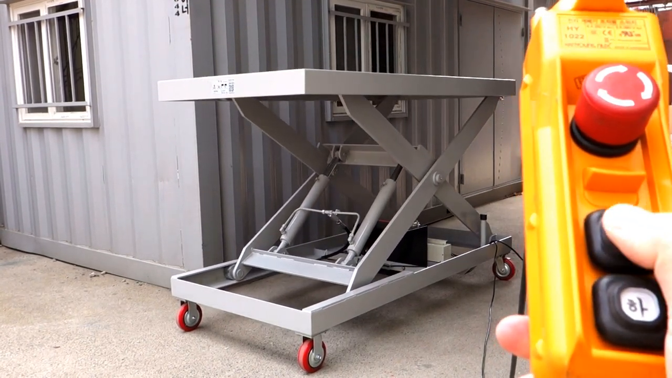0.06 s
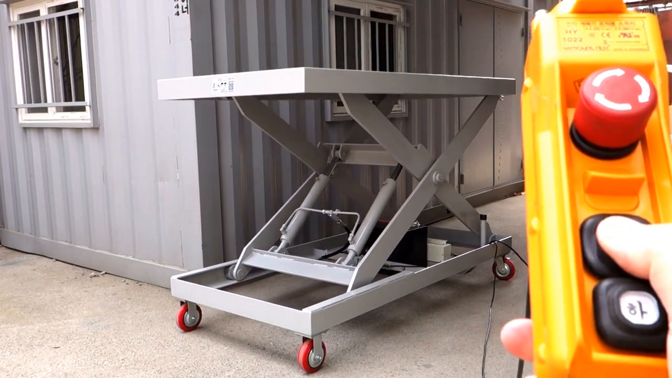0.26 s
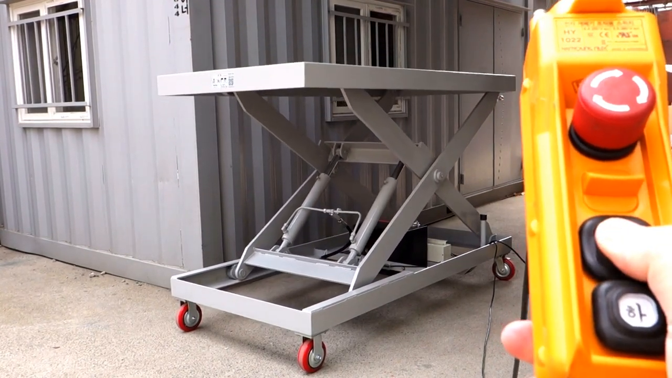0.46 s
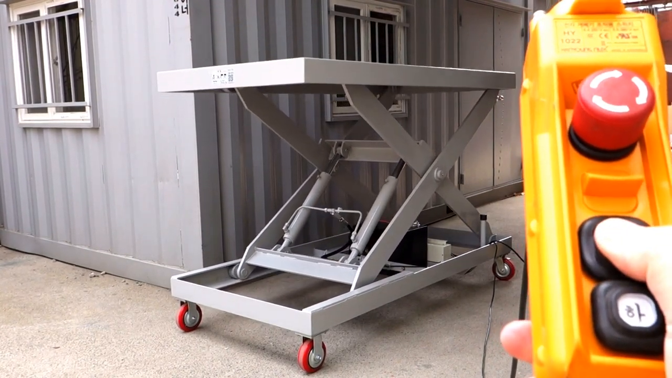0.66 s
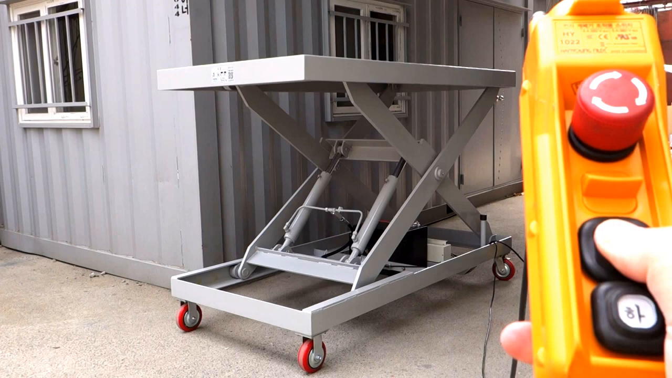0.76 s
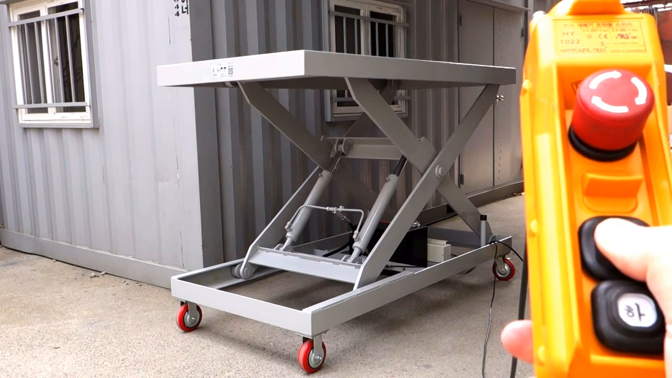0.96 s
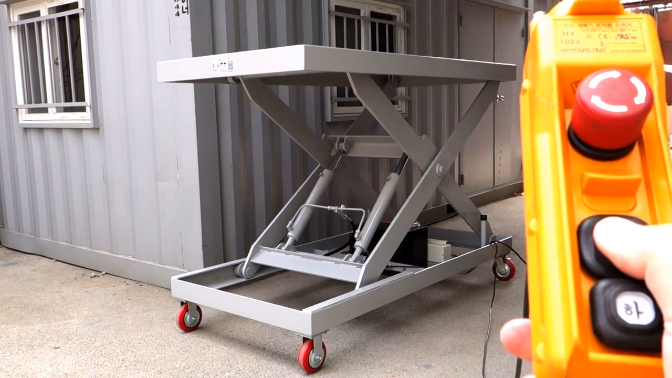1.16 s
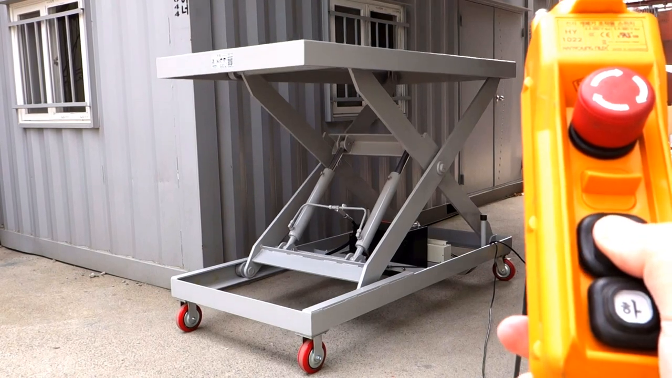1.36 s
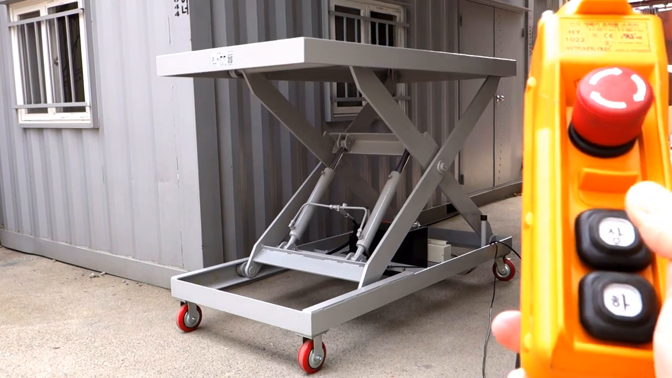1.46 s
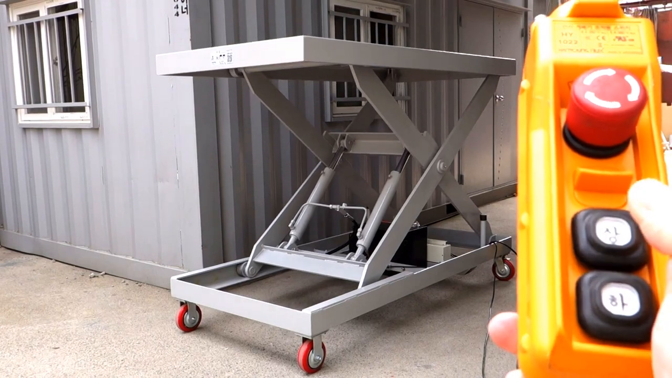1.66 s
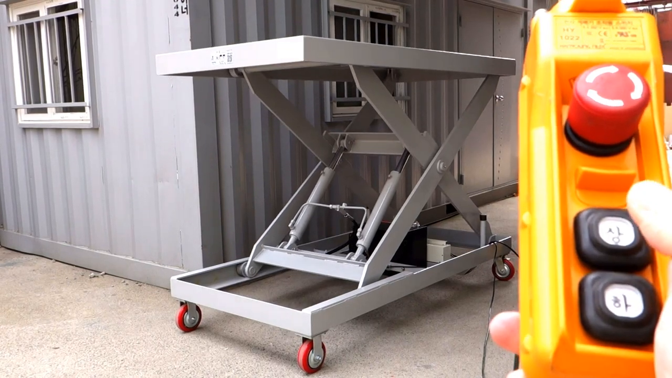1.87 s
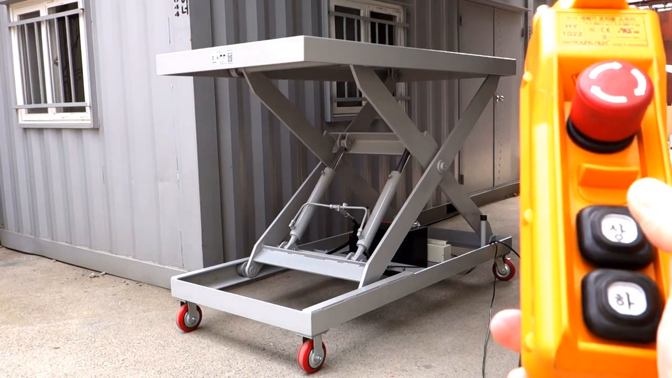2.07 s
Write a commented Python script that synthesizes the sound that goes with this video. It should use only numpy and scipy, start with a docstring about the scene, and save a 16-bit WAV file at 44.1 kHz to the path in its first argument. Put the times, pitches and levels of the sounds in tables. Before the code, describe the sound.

An electric hydraulic pump raises a lift table: button click, hard contactor clack, steady buzzing hum with rattles and a short groan, then a click and loud steel clank, ringing in a metal-walled yard, close stereo microphone.

```python
"""A hydraulic lift table runs for a second in a yard between metal walls, heard by two close microphone ports.
The motor hums at a mains multiple and beats against the tooth tones of a nine-tooth gear pump.
A hand-held button clicks, the contactor slams, and the frame groans and rattles as it takes the load.
On release the button clicks and the table stops with a clank that rings off the walls as decaying noise.
Behind it lie the filtered noise of far traffic and machinery, a low rumble and, late on, a faint drone."""
import sys
import numpy as np
from scipy import signal
from scipy.fft import rfft, irfft
from scipy.io import wavfile
from scipy.ndimage import uniform_filter1d, map_coordinates

SR = 44100
rng = np.random.default_rng(int(sys.argv[2]) if len(sys.argv) > 2 else 0)


def level_to_linear(level):
    """Convert decibel levels to linear amplitude factors, elementwise."""
    exponent = np.asarray(level, float) / 20
    return 10 ** exponent


def dump_mix(stems):
    """Bounce the given channels to the path in sys.argv[1] as a 16-bit WAV at rate SR."""
    frames = np.atleast_2d(stems).T  # one column per channel
    limited = np.clip(frames, -1, 1)  # hard clip at full scale
    pcm = np.round(limited * 32767).astype(np.int16)
    wavfile.write(sys.argv[1], SR, pcm)


N = 94815
T = np.arange(N) / SR
ON_S, OFF_S = 0.211, 1.457  # the motor gets power, and loses it


def evened(x):
    """Scales a signal to an rms of one."""
    return x / np.sqrt(np.mean(x ** 2) + 1e-20)


def curve(rows, index=1):
    """Draws one column of a timed table as a line over the whole scene."""
    columns = np.transpose(rows)
    return np.interp(T, columns[0], columns[index])


def read(points, hz):
    """Reads a table of values against pitch, on a logarithmic pitch scale."""
    f, value = np.transpose(points)
    return np.interp(np.log(hz + 1), np.log(f + 1), value)


def coloured(x, points):
    """Filters a signal by a table of gains in dB, mirrored in time so that the ends do not wrap."""
    gain = level_to_linear(read(points, np.fft.rfftfreq(2 * N, 1 / SR)))
    mirrored = np.r_[x, x[::-1]]
    return irfft(rfft(mirrored) * gain, 2 * N)[:N]


def noise(points):
    """White noise coloured by a table and scaled to an rms of one."""
    return evened(coloured(rng.standard_normal(N), points))


def waver(depth_db=1):
    """A slow random wandering of level, depth_db rms."""
    drift = uniform_filter1d(rng.standard_normal(N), size=4000)
    return level_to_linear(depth_db * evened(uniform_filter1d(drift, size=4000)))


def strike(rows, modes, colour, decay, dense_db):
    """Each blow rings the named modes with uneven strength, over a burst of modes too dense to tell apart."""
    mode_scatter = 0.012  # spread of each mode's pitch from blow to blow, as a fraction
    t, out = np.arange(SR // 3) / SR, np.zeros(N)
    hz, db, t60 = np.transpose(modes)[:, :, None]
    attack = np.minimum(t / 0.00015, 1)
    for start_s, level_db, tilt_db in rows:
        luck = rng.standard_normal((len(modes), 2))
        mode_db = db + tilt_db * np.log2(hz / 1000) + luck[:, :1] - 60 * t / t60
        mode_hz = hz * (1 + mode_scatter * luck[:, 1:])
        ring = (level_to_linear(mode_db) * np.sin(2 * np.pi * mode_hz * t)).sum(0)

        f, frame_s, z = signal.stft(rng.standard_normal(len(t)), SR, nperseg=192)
        colour_db = read(colour, f) + tilt_db * np.log2((f + 300) / 1300)
        decay_db = -60 * frame_s / read(decay, f)[:, None]
        dense = signal.istft(z * level_to_linear(colour_db[:, None] + decay_db), SR, nperseg=192)[1][:len(t)]

        blow = ring / abs(ring).max() + level_to_linear(dense_db) * dense / abs(dense).max()
        part = out[round(start_s * SR):][:len(t)]
        part += (level_to_linear(level_db) * blow * attack)[:len(part)]
    return out


# Colour of the far yard noise. Each row: pitch in Hz, relative level in dB per Hz.
YARD_COLOUR = [(12, -68), (20, -6.5), (64, -2.5), (157, -5.5), (306, -3), (439, -10.5), (686, -10),
               (811, -15), (1540, -18.5), (2090, -23.5), (15500, -68.5)]
# Level of the yard noise at the microphone. Each row: time in seconds, rms level in dB.
YARD_LEVEL = [(0, -38), (.2, -37.5), (1.0, -36), (1.7, -33.5), (2.15, -34.5)]


def yard():
    """Far traffic and machinery reach the microphone as a dull wash of noise."""
    return noise(YARD_COLOUR) * level_to_linear(curve(YARD_LEVEL))


# A faint drone in the yard. Each row: time in seconds, pitch in Hz, level in dB before the shared lift.
DRONE_PATH = [(1.62, 224.4, -66), (1.72, 224.5, -42), (1.8, 223.4, -41), (1.92, 228.2, -45.5),
              (2.03, 223.8, -47.5)]
# Harmonics of the drone, from the first multiple to the third: relative level in dB.
DRONE_HARMONICS = [-0.55, 0.12, -7]


def drone():
    """Three harmonics follow one gliding pitch, each wavering by itself."""
    lift_db = 4
    turns = np.cumsum(curve(DRONE_PATH)) / SR
    tone = np.zeros(N)
    for k, db in enumerate(DRONE_HARMONICS, start=1):
        tone += level_to_linear(db + lift_db) * np.sin(2 * np.pi * k * turns) * waver(depth_db=2)
    return tone * level_to_linear(curve(DRONE_PATH, index=2)) * (T > DRONE_PATH[0][0])


# Level of the low rumble. Each row: time in seconds, rms level in dB.
RUMBLE_LEVEL = [(0, -44), (.4, -58), (.6, -48), (.9, -38.5), (1.1, -49), (1.4, -75), (2.15, -47)]


def rumble():
    """A narrow band of low noise swells and fades."""
    hz = 46.8  # pitch from which the band's corners are scaled
    band = [(hz * 0.5, -20), (hz * 1.2, -3), (hz, 0.1), (hz * 1.22, -5), (hz * 2, -40), (20000, -120)]
    return noise(band) * level_to_linear(curve(RUMBLE_LEVEL))


# Ringing time between the metal walls. Each row: pitch in Hz, time to die by 60 dB in seconds.
WALL_T60 = [(200, 0.83), (1000, 0.64), (4000, 0.68), (10000, 0.48), (15000, 0.56)]


def walls(x):
    """The walls answer with a noise tail, each band dying at its own speed."""
    late_noise = rng.standard_normal(SR) * (np.arange(SR) > 300)  # the first 7 ms stay silent
    hz, t, z = signal.stft(late_noise, SR, nperseg=256)
    tail = signal.istft(z * level_to_linear(-60 * t / read(WALL_T60, hz)[:, None]), SR, nperseg=256)[1]
    return signal.fftconvolve(x, tail / np.linalg.norm(tail))[:N]


# Clicks of the hand-held button. Each row: start in seconds, level in dB, brightness in dB per octave.
BUTTON_CLICKS = [(.1874, -25, -3), (.1982, -19.5, 0), (1.4292, -19, 0), (1.7936, -46, -2)]
# Modes of its plastic case. Each row: pitch in Hz, relative level in dB, time to die by 60 dB in seconds.
PLASTIC_MODES = [(1950, -4, .012), (3050, -7, .01), (3800, -1, .014), (4600, -1, .012), (5900, -10, .012),
                 (7700, -7, .01), (8700, -10, .008), (10600, -15, .008), (14000, -20, .006)]
# Colour of the plastic snap. Each row: pitch in Hz, relative level in dB per Hz.
SNAP_COLOUR = [(1200, -10), (2000, 0), (4300, 2), (8000, -4), (15000, -12)]
# Decay of the snap. Each row: pitch in Hz, time to die by 60 dB in seconds.
SNAP_DECAY = [(1000, 0.03), (15000, 0.01)]


def button():
    """The button's small plastic case snaps and rings for about a hundredth of a second."""
    return strike(BUTTON_CLICKS, PLASTIC_MODES, SNAP_COLOUR, SNAP_DECAY, dense_db=0.06)


# Colour of dense sheet-metal modes. Each row: pitch in Hz, relative level in dB per Hz.
CRASH_COLOUR = [(150, -22), (320, 2.5), (700, -1.5), (1300, 5.5), (2100, -1.5), (4000, -10), (6000, -20.5),
                (9000, -19.5), (15000, -32.5)]
# Decay of those modes. Each row: pitch in Hz, time to die by 60 dB in seconds.
CRASH_DECAY = [(300, 0.1), (1500, 0.11), (4000, 0.083), (10000, 0.072)]


def sheet_metal(rows, modes, dense_db):
    """Blows ring a metal part's own modes over the crash of crowded sheet-metal modes."""
    return strike(rows, modes, CRASH_COLOUR, CRASH_DECAY, dense_db)


# The contactor closing and bouncing. Each row: start in seconds, level in dB, brightness in dB per octave.
CONTACTOR_SLAMS = [(.2095, -15, -6), (.2165, -15.5, 3), (.224, -19, 0)]
# Modes of the contactor. Each row: pitch in Hz, relative level in dB, time to die by 60 dB in seconds.
CONTACTOR_MODES = [(258, -9, .2), (340, 5, .09), (651, 0, .32), (1314, -4, .07), (1599, -5, .07),
                   (1825, -2, .08), (2132, -14, .07), (2552, -15, .06), (3300, -14, .035), (3919, -15, .03),
                   (5900, -16, .025)]


def contactor():
    """The contactor slams shut and bounces, ringing its modes at each contact."""
    return sheet_metal(CONTACTOR_SLAMS, CONTACTOR_MODES, dense_db=-3.0)


# Blows on the steel frame. Each row: start in seconds, level in dB, brightness in dB per octave.
FRAME_KNOCKS = [(.32, -25, 2.5), (.379, -30, -1), (.391, -29, 0.5), (.478, -29.5, 3.5), (.495, -18.5, -16),
                (.525, -29.5, 5), (.67, -28, -3.5), (1.4515, -18, -5.5), (1.4575, -8, -2.5),
                (1.461, -13, 3.5), (1.465, -14.5, -6), (1.477, -17.5, 1.5), (1.505, -19.5, -0.5),
                (1.53, -25, 0.5), (1.556, -26.5, 3)]
# Modes of the frame when struck. Each row: pitch in Hz, relative level in dB, 60 dB decay in seconds.
FRAME_MODES = [(222, -11, .1), (381, -6, .07), (560, -2, .1), (690, 1, .05), (870, -5, .07), (990, -1, .1),
               (1093, -4, .04), (1319, 1, .1), (1700, -9, .07), (2099, -1, .12), (2557, -10, .08),
               (3634, -10, .07)]


def frame_knocks():
    """The steel frame is knocked as the load comes on, and clanks when the table stops."""
    return sheet_metal(FRAME_KNOCKS, FRAME_MODES, dense_db=0.78)


# Level of the rattle before the low cut. Each row: time in seconds, level in dB.
RATTLE_LEVEL = [(.21, -37.5), (.3, -31.5), (.4, -33.5), (.52, -31), (.6, -38.5), (.75, -43.5),
                (1.45, -44.5), (1.47, -26.5), (1.6, -43.5), (1.75, -43.5)]


def rattle():
    """Loose joints chatter into the frame while the load settles; each joint rings it a little differently."""
    taps_per_s, spread_db = 1500, 2.5  # all joints together; mean excess of a tap's level
    joints = FRAME_MODES * 3
    t, out = np.arange(SR // 4) / SR, np.zeros(N)
    for hz, db, t60 in joints:
        tapped = rng.random(N) < taps_per_s / len(joints) / SR
        taps = level_to_linear(spread_db * np.minimum(rng.exponential(1, N), 4)) * tapped
        # duller than a blow, and dying 2.5 times as fast
        ring_db = db - 6.6 * np.log2(hz / 1000) - 150 * t / t60
        ring = level_to_linear(ring_db) * np.sin(2 * np.pi * hz * rng.uniform(0.88, 1.12) * t)
        out += signal.oaconvolve(taps, ring)[:N]
    return evened(out) * level_to_linear(curve(RATTLE_LEVEL)) * (T > ON_S)


# Level of the frame's groan as pressure builds. Each row: time in seconds, rms level in dB.
SURGE_LEVEL = [(.3, -52), (.38, -25.5), (.46, -31), (.52, -45), (.62, -48.5)]


def surge():
    """The frame groans as pressure builds: a rough band of low noise while the load comes on."""
    hz = 306  # strongest pitch of the groan
    band = [(20, -90), (hz * 0.35, -17), (hz * 0.94, -4), (hz, 0.1), (hz * 1.08, -6), (hz * 2, -30),
            (20000, -120)]
    return noise(band) * level_to_linear(curve(SURGE_LEVEL))


SHAFT_HZ = 29.725  # full speed
BEAT_S = 0.991  # hum and first tooth tone crest together here


def running(rise_s):
    """Strength of a motor sound: it rises from switch-on and dies away after switch-off."""
    stop_s = 0.082
    rise = 1 - np.exp(-np.maximum(T - ON_S, 0) / rise_s)
    return rise * np.exp(-np.maximum(T - OFF_S, 0) / stop_s)


def shaft_turns():
    """Turns of the shaft as it runs up to speed, counted from the moment BEAT_S."""
    spin_s, slip = 0.036, 0.22  # time constant of the run-up; fraction of speed missing at the start
    speed_hz = SHAFT_HZ * (1 - slip * np.exp(-np.maximum(T - ON_S, 0) / spin_s))
    turns = np.cumsum(speed_hz) / SR
    return turns - turns[round(BEAT_S * SR)]


def mains_hum():
    """The motor's iron hums steadily at a mains multiple."""
    hum_hz, peak_db = 239.98, -30
    return level_to_linear(peak_db) * running(0.017) * waver() * np.cos(2 * np.pi * hum_hz * (T - BEAT_S))


# Pump pressure as heard. Each row: time in seconds, tooth-tone level in dB before the shared lift,
# brightness in dB per octave (scaled down for the turn pattern).
PUMP_LOAD = [(.21, -48, -8), (.3, -36, -8), (.365, -33, -6), (.38, -26.5, -3.5), (.46, -26.5, -4),
             (.475, -30, -4), (.497, -23.5, -2.5), (.53, -25, -2.5), (.6, -27.5, -3), (.75, -29, -1.5),
             (1.0, -30, 0), (1.456, -30, 0), (1.475, -26, -9), (1.518, -27, -9), (1.56, -75, -9)]
# Harmonics of the tooth tone. Each row: multiple of the tooth rate, relative level in dB.
TOOTH_HARMONICS = [(1, 0), (2, -10), (3, -17), (4, -8.5), (5, -28), (6, -23), (7, -27), (8, -25), (9, -30),
                   (10, -23.5), (11, -29), (12, -29.5), (13, -35), (14, -35), (15, -37), (16, -41),
                   (17, -41), (18, -42), (19, -42), (20, -44), (21, -42), (22, -38), (23, -38), (24, -40),
                   (25, -42), (26, -35), (27, -40), (28, -42), (29, -41), (30, -40), (31, -33), (32, -41),
                   (33, -35), (34, -36), (35, -36), (36, -40), (37, -39), (38, -33), (39, -37), (40, -37)]


def pump_teeth(turns):
    """Each tooth of the gear pump pushes a pulse of oil, giving harmonics of the tooth rate."""
    teeth, lift_db = 9, 3.5
    level_db, bright_db = curve(PUMP_LOAD) + lift_db, curve(PUMP_LOAD, index=2)
    tone = np.zeros(N)
    for k, db in TOOTH_HARMONICS:
        octaves = min(np.log2(k), 2)  # brightness stops growing after two octaves
        phase = (k > 1) * rng.random()
        tone += level_to_linear(level_db + db + bright_db * octaves) * np.cos(2 * np.pi * (k * teeth * turns + phase))
    return tone * waver() * (T > ON_S)


# Shaft orders before load brightness and random spread. Each row: pitch in Hz, rms level of an order in dB.
TURN_ORDERS = [(40, -65.5), (400, -53), (1200, -71.5), (2600, -66), (3600, -72.5), (5000, -88), (7000, -82),
               (10000, -76), (13500, -80), (15500, -86)]


def turn_pattern(turns):
    """Unevenness of the rotating parts: a fixed random waveform that repeats every turn."""
    spread_db = 5
    order = np.arange(2049)
    hz = order * SHAFT_HZ
    size = level_to_linear(read(TURN_ORDERS, hz) + spread_db * rng.standard_normal(2049))
    size = size * (hz < 15900) * (order > 0)
    # the factors make size the rms of each order
    cycle = irfft(size * np.exp(2j * np.pi * rng.random(2049))) * 2048 * np.sqrt(2)
    pattern = map_coordinates(cycle, [turns % 1 * 4096], order=3, mode="grid-wrap")
    return running(0.09) * pattern * level_to_linear(0.28 * curve(PUMP_LOAD, index=2))


# Colour of oil and fan noise. Each row: pitch in Hz, relative level in dB per Hz.
HISS_COLOUR = [(250, 9), (600, 3.5), (1200, -17), (2800, 5.5), (4000, -21), (5400, -11), (7000, -9.5),
               (8200, -9.5), (9000, -13.5), (10200, -1.5), (11800, -35), (13500, -8), (15500, -48)]


def oil_hiss():
    """Oil and fan noise: coloured noise that starts and stops with the motor."""
    full_rms_db = -46.5
    return running(0.0067) * level_to_linear(full_rms_db) * noise(HISS_COLOUR)


def motor():
    """Motor and pump on one shaft: mains hum, tooth tones, a pattern that repeats every turn, and hiss."""
    turns = shaft_turns()
    return mains_hum() + pump_teeth(turns) + turn_pattern(turns) + oil_hiss()


# Level balance of the two microphone ports. Each row: pitch in Hz, left minus right in dB.
PORT_LEAN = [(60, 0), (180, 0), (550, 0.1), (1650, -1), (4970, -4), (15000, -8)]
# Unlike part of the two ports. Each row: pitch in Hz, gain in dB.
PORT_APART = [(60, -43), (130, -34), (290, -21), (640, -13), (1410, -8.5), (3100, -2.5), (6820, 1),
              (15000, -5.5)]


def ports(mid, clicks):
    """Two close microphone ports: a smeared part of opposite sign sets them apart, more so as pitch rises."""
    smear_s = 0.018  # decay time constant
    smear = rng.standard_normal(4000) * np.exp(-np.arange(4000) / SR / smear_s)
    smeared = signal.fftconvolve(mid - 0.4 * clicks, smear / np.linalg.norm(smear))[:N]
    side = coloured(smeared, PORT_APART)
    left = coloured(mid, np.array(PORT_LEAN) * [1, 0.5])
    right = coloured(mid, np.array(PORT_LEAN) * [1, -0.5])
    return np.array([left + side, right - side])


def scene():
    """All sources meet at the microphone, with blows, button and a little of the motor sent to the walls."""
    blows = contactor() + frame_knocks() + rattle()
    # the blows carry little below 150 Hz
    blows = signal.sosfilt(signal.butter(2, 150, "high", fs=SR, output="sos"), blows)
    clicks, unit = button(), motor()
    echoes = level_to_linear(-3) * walls(blows + 0.86 * clicks + 0.08 * unit)
    background = yard() + drone() + rumble()
    return ports(background + echoes + clicks + blows + surge() + unit, clicks)


def roll_off(x):
    """The treble ends steeply here."""
    return signal.sosfilt(signal.butter(12, 16460, fs=SR, output="sos"), x)


# Band limits of the microphone. Each row: pitch in Hz, gain in dB.
MICROPHONE_BAND = [(15, -30), (40, 0), (15350, 0), (15750, -70)]


def record(dry):
    """The microphone limits the band of each port, and a short fade closes both ends."""
    fade_s = 0.004
    fade = np.clip(np.minimum(T, T[::-1]) / fade_s, 0, 1)
    mix = np.array([coloured(port, MICROPHONE_BAND) for port in dry]) * fade
    return roll_off(mix)


dry = scene()
out = record(dry)
dump_mix(out)
```